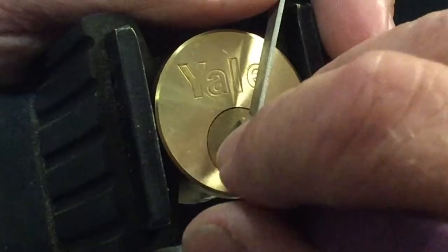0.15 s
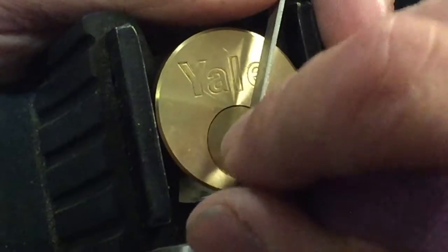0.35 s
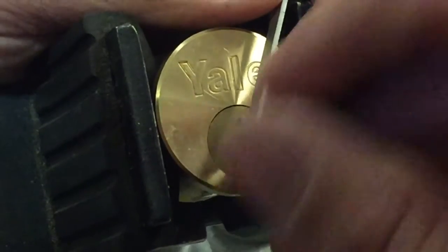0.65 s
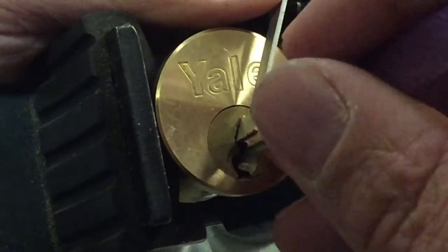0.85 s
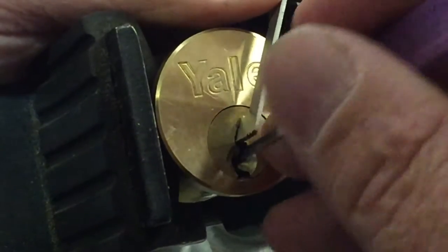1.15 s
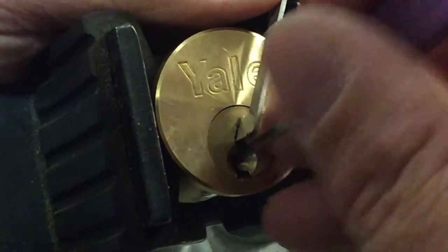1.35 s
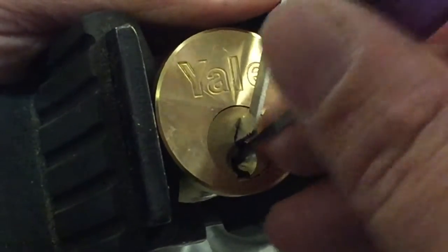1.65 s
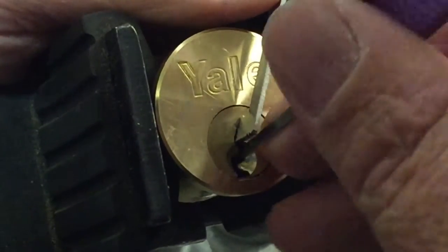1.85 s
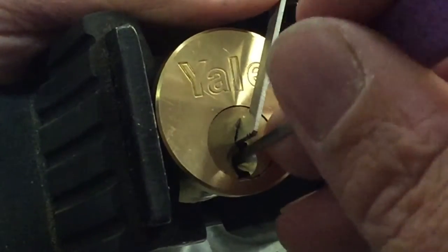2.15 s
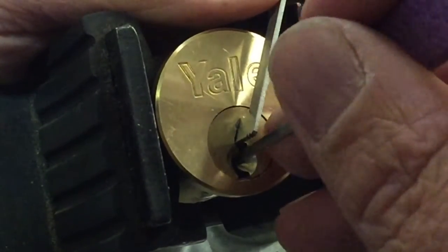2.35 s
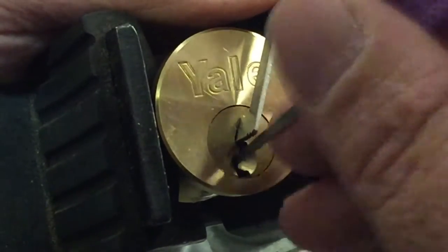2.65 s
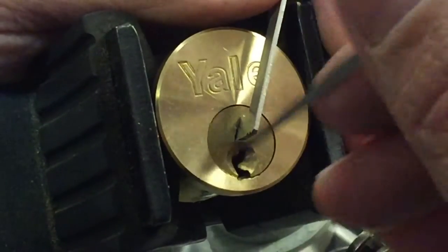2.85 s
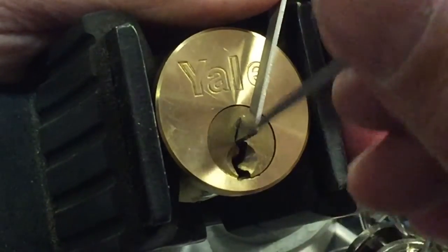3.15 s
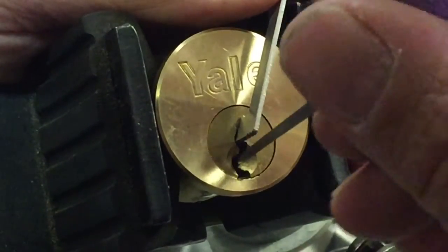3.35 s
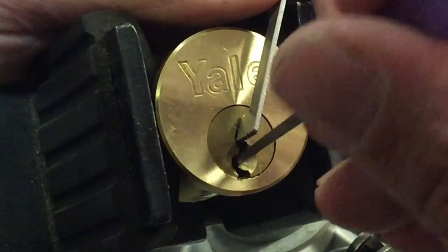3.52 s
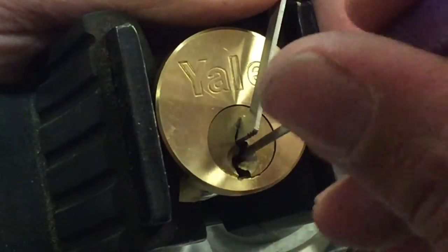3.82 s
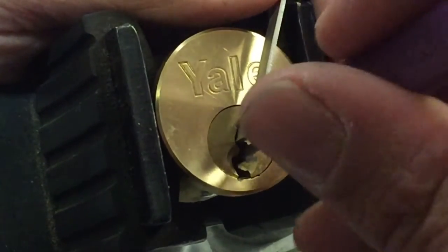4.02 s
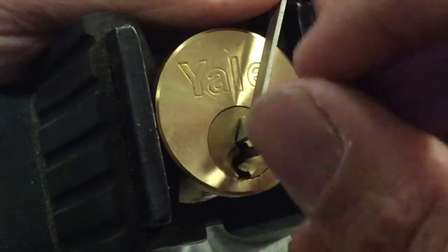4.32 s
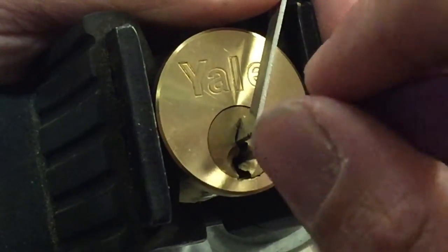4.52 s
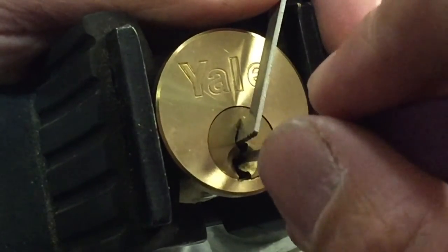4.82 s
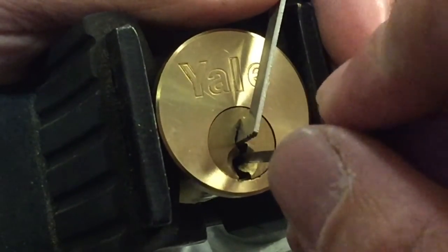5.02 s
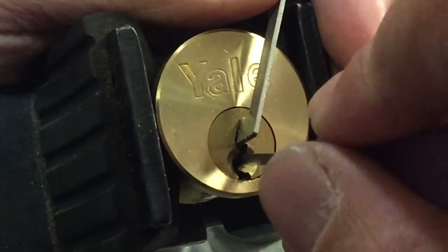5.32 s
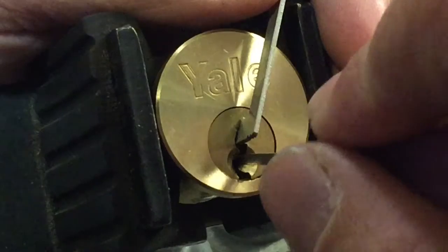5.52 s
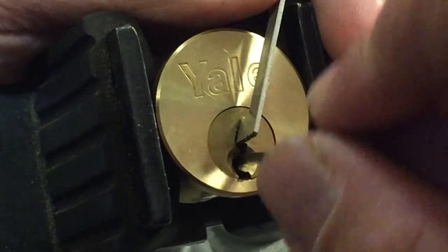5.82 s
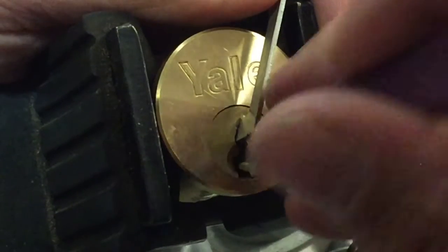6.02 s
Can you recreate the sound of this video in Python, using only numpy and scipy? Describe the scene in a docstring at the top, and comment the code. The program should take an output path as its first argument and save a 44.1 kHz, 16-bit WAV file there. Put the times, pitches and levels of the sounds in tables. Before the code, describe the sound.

A lock is picked close to the microphone in a small, quiet room with a faint fan whir and a low, wavering hum. Thin, bright ticks and tiny scrapes of steel on brass come irregularly, sparse at first and thickest just past the middle, where hands softly shift on the vice. Three times a pin snaps with a short metallic ring. A faint scrape comes at the end.

```python
"""Picking a brass lock

Close up, a steel hook pick ticks and scrapes along the keyway of a lock cylinder held in a vice.
Three times a pin snaps free and rings the brass. Hands shift on the vice with a soft rumble.
A small room answers; a fan whirs in it over a low, wavering hum and a faint hiss."""
import sys
import numpy as np
from scipy import signal
from scipy.fft import rfft, irfft, next_fast_len
from scipy.io import wavfile
from scipy.ndimage import map_coordinates

SR = 44100
rng = np.random.default_rng(int(sys.argv[2]) if len(sys.argv) > 2 else 0)


def pcm_store(signal):
    """Save signal as 16-bit PCM."""
    levels = np.round(np.clip(np.atleast_2d(signal), -1, 1) * 32767)
    wavfile.write(sys.argv[1], SR, levels.astype(np.int16).T)


N = 272097
TOP_HZ = 16150
FAVOUR_DB, FAVOUR_WIDTH_HZ = 6, 220  # where the metal is touched decides which mode stands out
CLICK_SPAN = .002 * SR  # a click's level counts its energy as spread over 2 ms


# The brass cylinder's modes. Each row: pitch in Hz, width in Hz, relative level in dB.
BRASS_MODES = [(1980, 170, -10), (2890, 260, 2), (2930, 35, -10), (4120, 300, -4), (5450, 210, -1),
               (6030, 280, -6), (7330, 400, -11), (8500, 25, -18), (9200, 420, -4), (10750, 650, -5),
               (12400, 550, -3), (13150, 600, -4), (15400, 700, -12)]
# Pins snap free and land, or just settle. Each row: start in seconds, level in dB, then knock, mid
# and top in dB against the 12 kHz band, favoured mode in Hz.
SNAPS = [(2.2006, -36, -16, -9, -10, 10750), (2.2013, -33, -3, 0, -9, 6030),
         (2.5619, -27.5, -28, -15, -17, 12400), (2.5627, -30.5, -15, -13, -19, 5450),
         (4.432, -66, 3, 10, -10, 5450), (4.7536, -34, -12, -5, -17, 8500),
         (4.7542, -31.5, -1, -3, -20, 1980)]

def pins():
    """Each snap rings the cylinder; the room gathers it from all sides, which evens out its modes."""
    track = contacts(SNAPS, BRASS_MODES, grip_loss=.002, crack_db=-11, crack_t60=.0048,
                     low_cut_hz=1674, haze_db=-29, haze_s=.003)
    lead = 256
    for s, db, knock_db, mid_db, top_db, _ in SNAPS:
        colour = [(1200, knock_db - 25), (2000, knock_db - 3), (2400, knock_db - 3),
                  (2900, knock_db + 7), (4200, knock_db + .5), (5500, mid_db + 2), (7300, mid_db - 3),
                  (8500, mid_db + 1), (10500, -6), (12300, 0), (15500, top_db - 2)]
        diffuse = filtered(signal.unit_impulse(SR // 2, lead), eq(colour))
        diffuse = amp(db) * diffuse * np.sqrt(CLICK_SPAN / np.sum(diffuse ** 2))
        add(track, s - lead / SR, room(diffuse, near_db=-20.5, near_t60=.035, far_db=-21.3))
    return track


# The steel hook's modes. Each row: pitch in Hz, width in Hz, relative level in dB.
STEEL_MODES = [(3070, 49, -12.5), (4310, 50.8, -11.5), (5560, 170, -7.5), (6605, 170, 2.5),
               (7410, 300, 4.5), (8350, 580, 6), (9480, 112.6, -3), (11560, 260, -2), (12600, 220, -2.5),
               (14120, 466, -1), (15180, 578, -2)]

def pick():
    """Light, well-damped ticks and scrapes of the steel hook, with their faint echo."""
    rubbing = scrapes()
    ticks = contacts(strikes() + catches(), STEEL_MODES, grip_loss=.022, crack_db=-10, crack_t60=.0025,
                     low_cut_hz=2200, haze_db=-21, haze_s=.0014)
    direct = ticks + rubbing
    return direct + room(direct, near_db=-15.5, near_t60=.016, far_db=-27)


# The hook hits a pin or the keyway. Each row: start in seconds, level in dB, then mid and top in dB
# against the 12 kHz band, favoured mode in Hz.
HOOK_HITS = [(0.4116, -39.5, -1, 10.5, 15150), (0.737, -37, -4.5, -1, 9300), (0.7625, -54, 2, -4, 3100),
             (0.7993, -58, -2, -3, 9500), (0.8044, -58, 8, 2.5, 8400), (0.816, -59, 7, -3, 7480),
             (0.8382, -47.5, -8, -15, 11750), (1.3988, -68, -7, -8, 11750), (1.609, -69, -6, -15, 11750),
             (2.8220, -48, -12, -11, 12450), (2.837, -47, -7, -7, 12450), (2.8503, -43.5, -9, -6, 5550),
             (2.8775, -52, -11, -5, 5550), (2.9724, -48.5, 3, 1, 4350), (2.9837, -43.5, 2, -9, 4350),
             (3.2837, -46.5, -6, -22.5, 11600), (3.3069, -37.5, 9, 6, 15150), (3.3095, -38.5, 16, 4, 4350),
             (3.4118, -45.5, -4, -3, 11750), (3.4158, -49.5, 1, -6, 5550), (3.4387, -47.5, -4.5, -5, 12450),
             (3.5411, -51.5, -1, -4, 6620), (3.7415, -28.5, -5, -3, 5550), (3.7432, -23.5, 4, -5, 8300),
             (3.7611, -37, -3.5, 0.5, 9600), (3.7644, -40, 0, -11, 9540), (3.7908, -42.5, -7, -3.5, 9500),
             (3.7934, -45.2, -5, -2, 9500), (3.9993, -46.5, -4, -8, 5600), (4.037, -57.5, -7, -13, 12450),
             (4.2037, -53, 8, -2, 6620), (4.2065, -39, 6.5, 10, 6620), (6.0414, -57, 14, 0, 6640),
             (6.0917, -53, -8, -9, 14100)]

def strikes(rebound_s=.0018):
    """Contact rows for the hits: the springy hook lands, then rebounds softer and duller."""
    rows = []
    for s, db, mid_db, top_db, ring_hz in HOOK_HITS:
        knock_db = -13.3 + .85 * mid_db  # a blunter contact has more mid and more knock alike
        if ring_hz < CLICK_CROSSOVERS[0]:  # a low favoured mode adds to the knock
            knock_db += FAVOUR_DB / 2
        flight_s = rebound_s * rng.uniform(.7, 1.3)
        rows.append((s, db, knock_db, mid_db, top_db, ring_hz))
        rows.append((s + flight_s, db - 17, knock_db + 12, mid_db + 1, top_db - 1, ring_hz))
    return rows


# Three crossovers in Hz split a click into knock, mid, the 12 kHz band and top.
CLICK_CROSSOVERS = [4700, 9500, 14000]

def contacts(rows, modes, grip_loss, crack_db, crack_t60, low_cut_hz, haze_db, haze_s):
    """Metal meets metal: a crack and a short ring, damped by the fingers and the vice."""
    track = np.zeros(N)
    lead = 512  # samples of haze before the hit
    t = (np.arange(2048) - lead) / SR
    after = np.maximum(t, 0)
    attack = 1 - np.exp(-after / .00015)
    mode_hz, width, mode_db = np.transpose(modes)[:, :, None]
    width = width + grip_loss * mode_hz  # the grip damps high modes soonest
    decay = np.exp(-np.pi * width * after)
    hz = np.fft.rfftfreq(len(t), 1 / SR) + 1
    above = 1 / (1 + (np.array(CLICK_CROSSOVERS)[:, None] / hz) ** 30)
    bands = -np.diff(above, axis=0, prepend=1, append=0)
    radiated = (hz < TOP_HZ + 500) / np.sqrt(1 + (low_cut_hz / hz) ** 12)  # small parts give no bass
    for s, db, knock_db, mid_db, top_db, ring_hz in rows:
        # each contact point loads the modes differently, shifting their strength and pitch a little
        scatter_db = 2 * rng.standard_normal(mode_hz.shape)
        size = amp(mode_db + FAVOUR_DB * nearness(mode_hz, ring_hz) + scatter_db) * np.sqrt(width)
        pitch = mode_hz * (1 + .007 * rng.standard_normal(mode_hz.shape))
        phase = rng.uniform(0, 2 * np.pi, mode_hz.shape)
        ring = unit(attack * np.sum(size * decay * np.sin(2 * np.pi * pitch * after + phase), axis=0))
        crack = unit(attack * rng.standard_normal(len(t)) * amp(-60 * after / crack_t60))
        # a faint, brief haze of noise around each click softens its attack
        haze = unit(rng.standard_normal(len(t)) * np.exp(-np.abs(t) / haze_s))
        spectrum = rfft(ring + amp(crack_db) * crack + amp(haze_db) * haze) * radiated
        # the hardness of the contact shares the energy out among the bands
        strength = np.sqrt(bands ** 2 @ np.abs(spectrum) ** 2 / (bands ** 2 @ radiated))
        band_gains = amp([knock_db, mid_db, 0, top_db]) / strength
        click = irfft(spectrum * np.exp(np.log(band_gains) @ bands))
        add(track, s - lead / SR, amp(db) * click * np.sqrt(CLICK_SPAN / np.sum(click ** 2)))
    return track


# The colour of steel rubbing brass. Each row: frequency in Hz, relative level in dB.
FRICTION_EQ = [(1000, -36), (3300, 10.5), (4700, 1), (7000, -6), (10000, -11), (12500, 1), (16000, -6.5)]
# The hook drags over brass. Each row: start and end in seconds, relative level in dB,
# favoured mode in Hz.
STROKES = [(0.734, 0.75, -59.5, 3140), (0.737, 0.844, -71, 8400), (1.298, 1.332, -88, 11750),
           (1.37, 1.4, -84, 11750), (2.789, 2.844, -65, 11750), (2.847, 2.881, -59, 12450),
           (3.282, 3.319, -60, 11860), (3.429, 3.492, -77, 12450), (3.747, 3.774, -52, 8400),
           (3.986, 4.022, -63.5, 6620), (4.208, 4.225, -65, 6620), (5.983, 6.033, -83.5, 12450),
           (6.042, 6.087, -74, 6620), (6.088, 6.100, -67, 14100), (6.141, 6.207, -67, 6620)]

def scrapes(slips_per_s=1200, rub_share=.5, level_db=4, favour_db=-6.5, whisper_db=-39):
    """Under each stroke the tip catches and slips in tiny jolts that ring the pick."""
    pressure = np.zeros(N)
    emphasis = np.zeros((len(STEEL_MODES), N))
    for start, end, db, ring_hz in STROKES:
        progress = np.linspace(0, 1, max(round((end - start) * SR), 2))
        stroke = amp(db) * np.sqrt(np.abs(np.sin(np.pi * progress)))
        add(pressure, start, stroke)
        for envelope, (mode_hz, _, _) in zip(emphasis, STEEL_MODES):
            add(envelope, start, stroke * nearness(mode_hz, ring_hz))
    slips = (rng.random(N) < slips_per_s / SR) * amp(4 * rng.standard_normal(N))
    jolts = unit(signal.fftconvolve(slips, np.exp(-np.arange(64) / 12))[:N])
    friction = filtered((jolts + rub_share) * rng.standard_normal(N), eq(FRICTION_EQ))
    # as the contact point slides, now one resonance speaks and now another
    voices = []
    for mode_hz, width, db in STEEL_MODES:
        ring = filtered(friction, lambda hz: resonances([(mode_hz, 2 * width + 150, db / 2)], hz) ** 2)
        voices.append(amp(5 * wobble(70)) * ring)
    favoured = sum(envelope * unit(voice) for envelope, voice in zip(emphasis, voices))
    steel = pressure * unit(.1 * friction + sum(voices)) + amp(favour_db) * favoured
    # even the lightest slide whispers high up, and this grows only slowly with pressure
    whisper = noise(lambda hz: resonances([(11920, 2600, 0)], hz) ** 2)
    return amp(level_db) * steel + amp(whisper_db) * np.sqrt(pressure) * whisper


def catches(gap_s=.006, lift_db=2, spread_db=2, knock_db=-13, mid_db=-1.5, top_db=-6):
    """Contact rows along each stroke: the tip snags unevenly on small edges, favouring random modes."""
    rows = []
    for start, end, db, _ in STROKES:
        chance = rng.standard_normal((16, 3))
        rings_hz = rng.choice([hz for hz, _, _ in STEEL_MODES], size=len(chance))
        for k, (late, force, colour) in enumerate(chance):
            s = start + gap_s * (k + 1 + late / 3)
            if s < end:
                catch_db = db + lift_db + spread_db * force
                rows.append((s, catch_db, knock_db, mid_db + spread_db * colour, top_db, rings_hz[k]))
    return rows


def handling():
    """Hands shift on the vice with a soft, uneven rumble, most while the pick goes back in."""
    swell_db = np.interp(np.arange(N) / SR, [2.9, 3.5, 3.9, 4.3], [-73.5, -63.5, -63, -77])
    rumble = noise(eq([(35, -20), (70, 5), (130, -4.5), (400, -7.5), (900, -31), (2500, -120)]))
    return amp(swell_db + 3 * wobble(11)) * rumble


# The small room's tail. Each row: frequency in Hz, seconds to fall by 60 dB.
ROOM_DECAY = [(1500, 0.25), (6000, 0.29), (15000, 0.15)]

def room(x, near_db, near_t60, far_db):
    """Hands, vice and bench scatter the sound at once; the walls answer later and more faintly."""
    hz, frame_s, frames = signal.stft(rng.standard_normal(SR // 2), SR, nperseg=256)
    decay = amp(-60 * frame_s / along(ROOM_DECAY, hz)[:, None])
    tail = signal.istft(frames * decay, SR, nperseg=256)[1]
    t = np.arange(len(tail)) / SR
    tail *= 1 - np.exp(-t / .005)
    near = rng.standard_normal(len(t)) * amp(-60 * t / near_t60) * (1 - np.exp(-t / .0034))
    answer = amp(near_db) * near / np.linalg.norm(near) + amp(far_db) * tail / np.linalg.norm(tail)
    return signal.fftconvolve(x, answer)[:N]


# The rush of the fan's air. Each row: frequency in Hz, relative level in dB.
AIR_EQ = [(20, -11), (38, -15.5), (62, -4), (88, 1.5), (130, -1.5), (170, -6.5), (320, -9.5), (390, -9.5),
          (560, 2.5), (800, 1), (1100, 4.5), (1350, -5), (1700, -14), (2600, -19.5), (9000, -53)]
# The housing's resonances. Each row: pitch in Hz, width in Hz, relative level in dB before EQ.
HOUSING_MODES = [(215.7, 11.5, -13.5), (319, 19, -15), (612, 34, -11), (681, 20, 0), (767.2, 27, 2),
                 (803.3, 30, 2.5), (942.6, 25.4, 1), (983.7, 13, 3.5), (1024, 28, -4.5), (1166, 34, -11),
                 (1528, 19, -13.5), (2030, 113, -19), (2876, 120, -26.5)]
# The motor's whine. Each row: centre pitch in Hz, centre level in dB.
MOTOR_TONES = [(1273, -66.5), (1773, -80.5)]

def fan(flutter_db=.8, flutter_per_s=22):
    """Nearly steady air rushes through a resonant housing; the motor adds two thin, wavering tones."""
    air = amp(-59) * noise(eq(AIR_EQ))
    whir_eq = eq([(120, -30.5), (220, 2), (340, 1), (400, -4), (580, -1), (1500, -.5), (1700, -10.5),
                  (1960, -3.5), (2400, -12), (2900, -4.5), (5000, -41)])
    whir = amp(-54.5) * noise(lambda hz: resonances(HOUSING_MODES, hz) * whir_eq(hz))
    whine = np.zeros(N)
    for hz, db in MOTOR_TONES:
        level = amp(db + 3.2 * wobble(19))
        pitch = hz + 3.19 * wobble(25)
        whine += level * np.sin(2 * np.pi * np.cumsum(pitch) / SR)
    return (air + whir) * amp(flutter_db * wobble(flutter_per_s)) + whine


def hum(hz=52, width_hz=11, tone_db=-64.5, drone_db=-64.5):
    """A low hum that wavers: a steady tone beats against a narrow drone."""
    tone = np.sqrt(2) * np.sin(2 * np.pi * hz * np.arange(N) / SR)
    drone = noise(lambda f: np.exp(-.5 * ((f - hz) / (width_hz / 2)) ** 2))
    return amp(tone_db) * tone + amp(drone_db) * drone


# The colour of the hiss. Each row: frequency in Hz, relative level in dB.
HISS_EQ = [(1760, -20), (3200, -2.5), (4850, -5), (5890, -4), (7200, -6.5), (9320, -8), (10400, -11.5),
           (12400, -9.5), (15800, -15)]

def hiss():
    """A faint, steady bed of bright noise."""
    return amp(-77.5) * noise(eq(HISS_EQ))


def nearness(hz, ring_hz):
    """1 for the mode that a contact point favours, 0 for modes far from it."""
    return np.exp(-((hz - ring_hz) / FAVOUR_WIDTH_HZ) ** 2)


def amp(db):
    return 10 ** (np.asarray(db) / 20)


def unit(x):
    return x / np.sqrt(np.mean(x ** 2) + 1e-30)


def along(points, hz):
    """Read (Hz, value) points along a log frequency axis."""
    points_hz, values = np.transpose(points)
    return np.interp(np.log(hz + 1), np.log(points_hz + 1), values)


def eq(points):
    """A gain curve through (Hz, dB) points."""
    return lambda hz: amp(along(points, hz))


def wobble(rate):
    """A smooth random curve, rate knots a second."""
    return map_coordinates(rng.standard_normal(int(N * rate / SR) + 4), [np.arange(N) * rate / SR])


def filtered(x, response):
    """Shape x with a gain curve over frequency."""
    size = next_fast_len(len(x) + 4096)
    return irfft(rfft(x, size) * response(np.fft.rfftfreq(size, 1 / SR)), size)[:len(x)]


def resonances(modes, hz):
    """Gain of a set of (Hz, width, dB) resonances."""
    return np.sqrt(sum(amp(db) ** 2 / (1 + (2 * (hz - f) / width) ** 2) for f, width, db in modes))


def noise(response):
    """Coloured noise of rms 1."""
    return unit(filtered(rng.standard_normal(N), response))


def add(track, s, sound):
    """Mix a sound in at s seconds."""
    part = track[max(round(s * SR), 0):][:len(sound)]
    part += sound[:len(part)]


def scene():
    """The steady sound of the room with the lock work on top, in mono."""
    return (hiss() + fan() + hum() + handling() + pins() + pick())[None]


def record(dry):
    """A steep high cut takes off the very top."""
    return filtered(dry[0], lambda hz: 1 / np.sqrt(1 + (hz / TOP_HZ) ** 160))[None]


dry = scene()
out = record(dry)
pcm_store(out)
```